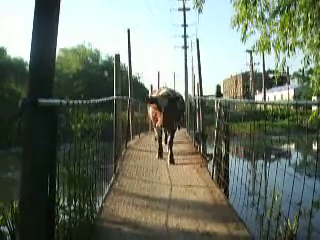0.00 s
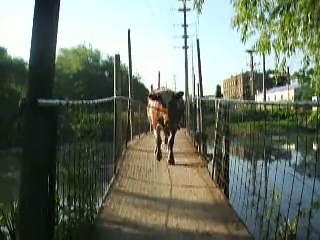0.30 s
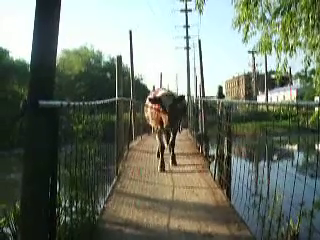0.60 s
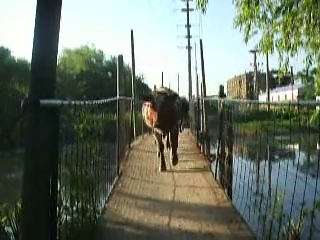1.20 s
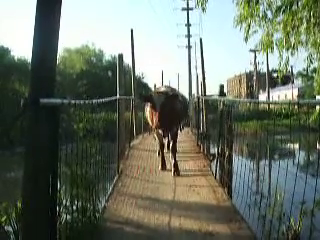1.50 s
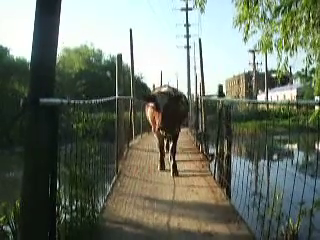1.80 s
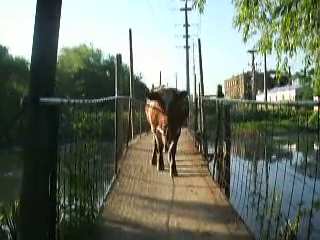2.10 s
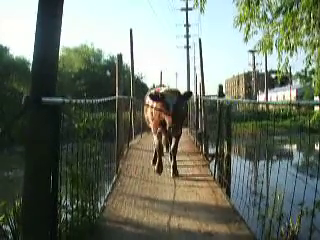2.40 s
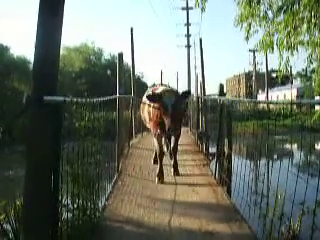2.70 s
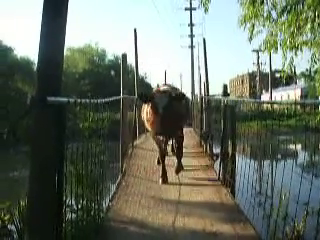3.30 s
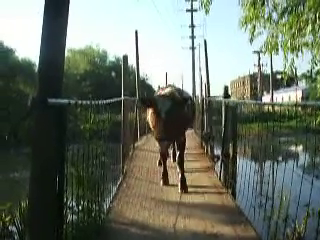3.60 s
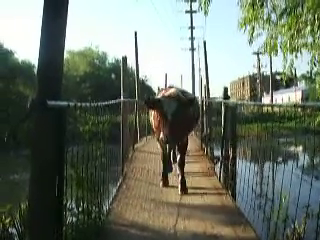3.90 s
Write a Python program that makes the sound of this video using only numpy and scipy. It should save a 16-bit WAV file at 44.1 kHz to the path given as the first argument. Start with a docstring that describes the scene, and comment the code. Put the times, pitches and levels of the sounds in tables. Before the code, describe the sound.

A cow's hooves knock and scrape on a hard footbridge while small birds chirp.

```python
"""A cow walks over a hard footbridge: its hooves knock on the deck, scrape grit and drag softly.
Each knock is a hollow thud, ringing deck modes, a rim pulse and a noise clack; scrapes are dense grains.
Small birds chirp around a pond in short sine glides with an echo.
Behind them are a steady hiss and the rumble and engine hum of distant traffic."""
import sys
import numpy as np
from scipy import signal
from scipy.fft import rfft, irfft, next_fast_len
from scipy.io import wavfile
from scipy.ndimage import map_coordinates

SR = 44100
rng = np.random.default_rng(int(sys.argv[2]) if len(sys.argv) > 2 else 0)


def persist_wave(psi):
    """Save psi, clipped to +-1, as 16-bit WAV."""
    counts = np.round(np.clip(psi, -1, 1) * 32767).astype(np.int16)
    wavfile.write(sys.argv[1], SR, np.atleast_2d(counts).T)


N = 176400


def amp(db):
    return 10 ** (np.asarray(db) / 20)


def unit_rms(x):
    return x / np.sqrt(np.mean(x ** 2) + 1e-20)


def clock():
    return np.arange(N) / SR


def curves(rows):
    """Per-sample curve for each column after time_s."""
    time_s, *columns = np.transpose(rows)
    return [np.interp(clock(), time_s, column) for column in columns]


def wobble(rate_hz):
    """Smooth random curve, rate_hz knots a second."""
    return map_coordinates(rng.standard_normal(int(N * rate_hz / SR) + 4), [clock() * rate_hz])


def filtered(x, response):
    """x through the gain response(hz)."""
    size = next_fast_len(N + SR // 2)
    return irfft(rfft(x, size) * response(np.fft.rfftfreq(size, 1 / SR)), size)[:N]


def coloured(x, spectrum):
    """x through (freq_hz, gain_db) points, rms 1."""
    freq_hz, gain_db = np.transpose(spectrum)
    return unit_rms(filtered(x, lambda hz: amp(np.interp(np.log(hz + 1), np.log(freq_hz), gain_db))))


def noise(spectrum):
    return coloured(rng.standard_normal(N), spectrum)


def noise_band(centre_hz, width_hz):
    white = rng.standard_normal(N)
    return unit_rms(filtered(white, lambda hz: 1 / (1 + (2 * (hz - centre_hz) / width_hz) ** 2)))


def add(track, start_s, sound):
    part = track[max(round(start_s * SR), 0):][:len(sound)]
    part += sound[:len(part)]


# freq_hz, gain_db
HISS_SPECTRUM = [(400, 2.5), (700, 4.5), (1100, 1.5), (1700, -0.5), (3800, -1.5), (5200, -4.5), (6500, -10),
                 (8000, -20)]
RUMBLE_SPECTRUM = [(28, -23), (38, 1.5), (50, -4), (75, -1.5), (175, -3), (280, -1.5), (420, -8.5),
                   (650, -13.5), (1200, -42.5)]
# centre_hz, width_hz, level_db
HISS_BANDS = [(1370, 22, -62), (2527, 56, -62.5), (3825, 230, -58.5)]
# time_s, hiss_db, rumble_db
BACKGROUND_LEVELS = [(0, -40, -35.5), (1.4, -40.5, -37.5), (2.2, -43.5, -39.5), (3.7, -44.5, -38.5),
                     (4, -40.5, -35)]


def hiss_and_traffic():
    """Steady hiss with faint narrow bands, over the rumble of distant traffic."""
    hiss_db, rumble_db = curves(BACKGROUND_LEVELS)
    hiss = noise(HISS_SPECTRUM) * amp(hiss_db + 0.5 * wobble(40))
    whine = sum(amp(db) * noise_band(hz, width_hz) for hz, width_hz, db in HISS_BANDS)
    rumble = noise(RUMBLE_SPECTRUM) * amp(rumble_db + 0.8 * wobble(15))
    return hiss + whine * amp(hiss_db - hiss_db.mean()) + rumble


# time_s, pitch_hz, level_db
ENGINE_HUM = [(0, 116, -43.5), (.9, 118.8, -41.5), (1.6, 127, -42.5), (2.3, 131.8, -47),
              (2.7, 135.5, -36.5), (3.3, 136, -48), (4, 142, -42)]


def engine():
    """A distant engine hums unsteadily and slowly gains speed."""
    pitch_hz, level_db = curves(ENGINE_HUM)
    phase = 2 * np.pi * np.cumsum(pitch_hz * (1 + 0.0094 * wobble(18))) / SR
    fundamental = np.sin(phase) * amp(2.2 * wobble(14))
    octave = np.sin(2 * phase) * amp(-9 + 1.5 * wobble(13))
    return amp(level_db) * (fundamental + octave)


# freq_hz, gain_db
DRAG_SPECTRUM = [(100, -18), (300, 9), (1000, 1), (1600, -9), (2500, 3), (3300, -3.5), (8000, -27)]
# centre_s, sigma_s, level_db
DRAGS = [(0.015, 0.034, -35.5), (0.255, 0.033, -31), (1.078, 0.04, -33), (1.347, 0.022, -40.5),
         (3.99, 0.019, -33.5)]


def hoof_drags():
    """A dragging hoof swishes: noise in Gaussian swells."""
    t = clock()
    swell = sum(amp(db) * np.exp(-((t - centre_s) / sigma_s) ** 2 / 2) for centre_s, sigma_s, db in DRAGS)
    return swell * noise(DRAG_SPECTRUM) * amp(0.34 * wobble(90))


# freq_hz, gain_db, t60_s
DECK_MODES = [(133, 2, 0.11), (211, 0.5, 0.25), (325, -3.5, 0.22), (388.6, -8, 0.24), (706, -8, 0.11)]
# freq_hz, gain_db
CLACK_SPECTRUM = [(80, -30), (200, 5.5), (400, 4.5), (900, -2.5), (1500, -19), (8000, -33)]
# start_s, level_db, thud_hz, clack_gain_db
HOOF_KNOCKS = [(0.125, -25, 148.5, -12), (.131, -26, 646, -8), (.333, -21.5, 240, -14),
               (.478, -25, 665, -9), (0.827, -27.5, 320, -7), (.969, -22, 560, -10),
               (1.128, -28.5, 317, -20), (1.28, -26, 300, -20.5), (1.524, -21, 321, -16.5),
               (1.682, -25, 345, -4), (2.004, -25.5, 290, -16), (2.024, -25.5, 232, -17),
               (2.423, -18.5, 259, -21), (2.479, -26.5, 268, -13), (2.794, -23.5, 282, -7),
               (2.887, -24.5, 287, -9), (2.915, -27.5, 217, -3.5), (3.335, -23, 263, -2.5),
               (3.798, -21.5, 359, 0.5), (3.819, -24.5, 245, -2.5)]


def hoof_knocks():
    """A hoof thuds at a pitch set by where it lands, rings deck modes near that pitch and clacks."""
    attack_s, thud_t60_cycles, spread_octaves = 0.00079, 29.4, 0.63
    clack_t60_s, tail_t60_s = 0.014, 0.32
    push_hz, push_delay_s = 474, 0.001
    out, t = np.zeros(N), clock()[:SR // 3]
    clack_noise = noise(CLACK_SPECTRUM)
    clack_decay = amp(-60 * t / clack_t60_s) + amp(-10.5 - 60 * t / tail_t60_s)
    attack = 1 - np.exp(-t / attack_s)
    mode_hz, mode_db, t60_s = np.transpose(DECK_MODES)
    u = (np.pi * push_hz * (t - push_delay_s)) ** 2
    rim_push = (1 - 2 * u) * np.exp(-u)  # one hard pulse from the hoof rim
    for start_s, level_db, thud_hz, clack_gain_db in HOOF_KNOCKS:
        detuning = np.log2(mode_hz / thud_hz) / spread_octaves
        weight = amp(mode_db + rng.normal(0, 1.3, len(mode_hz))) / (1 + 2 * detuning ** 2)
        phase = rng.uniform(0, 2 * np.pi, (len(mode_hz), 1))
        modes = np.sin(2 * np.pi * mode_hz[:, None] * t + phase) * amp(-5.5 - 60 * t / t60_s[:, None])
        ring = weight / weight.sum() @ modes
        thud = np.sin(2 * np.pi * thud_hz * t) * amp(-2 - 60 * t * thud_hz / thud_t60_cycles)
        clack = amp(clack_gain_db) * np.roll(clack_noise, rng.integers(N))[:len(t)] * clack_decay
        add(out, start_s, amp(level_db) * (thud + ring + clack) * attack)
        add(out, start_s, amp(level_db + clack_gain_db) * rim_push)
    return out


# start_s, pitch_hz, level_db
BIRD_PIPS = [(.472, 3200, -41), (.585, 3900, -38), (.832, 4150, -39), (1.16, 4500, -38.5),
             (2.165, 2650, -44), (2.483, 3650, -42), (3.105, 4400, -44), (3.167, 4200, -44.5),
             (3.355, 2880, -42), (3.404, 2880, -42)]
# start_s, length_s, start_hz, end_hz, level_db
BIRD_CHIRPS = [(1.622, .055, 4200, 2050, -42), (2.446, 0.038, 4700, 4200, -41.5),
               (2.508, 0.03, 3300, 4250, -40.5), (2.762, 0.028, 4300, 2500, -39),
               (2.942, 0.045, 2900, 2300, -43), (3.762, .024, 4300, 3050, -42),
               (3.94, .055, 2560, 2530, -39.5)]


def birds():
    """Wavering chirps, a run of four falling notes and short pips, with an echo."""
    pip_s, pip_end_ratio, echo_db, echo_t60_s = 0.018, 0.92, -6, 0.34
    out, waver, flutter = np.zeros(N), wobble(300), wobble(200)
    faint_pips = [(when * (N / SR - 2 * pip_s), 3400 * 2 ** (height - 0.5), -47)
                  for when, height in rng.random(size=(50, 2))]
    pips = [(start_s, pip_s, hz, hz * pip_end_ratio, db) for start_s, hz, db in BIRD_PIPS + faint_pips]
    falling_run = [(1.835 + k * 0.072, 0.045, 5900, 3200, -44) for k in range(4)]
    for start_s, length_s, start_hz, end_hz, level_db in BIRD_CHIRPS + falling_run + pips:
        progress = np.linspace(0, 1, int(length_s * SR))
        span = slice(int(start_s * SR), int(start_s * SR) + len(progress))
        pitch_hz = start_hz * (end_hz / start_hz) ** progress * (1 + 0.018 * waver[span])
        envelope = amp(level_db + 2.2 * flutter[span]) * np.sqrt(np.abs(np.sin(np.pi * progress)))
        add(out, start_s, envelope * np.sin(2 * np.pi * np.cumsum(pitch_hz) / SR))
    t = clock()[:SR // 2]
    tail = rng.standard_normal(len(t)) * amp(-60 * t / echo_t60_s)
    return out + amp(echo_db) * signal.fftconvolve(out, tail / np.linalg.norm(tail))[:N]


# freq_hz, gain_db
GRIT_SPECTRUM = [(500, -22), (1500, -10.5), (3000, 3.5), (3950, 6.5), (4700, 1), (6500, -4.5), (8500, -24)]
DECK_SPECTRUM = [(100, -12), (300, 4), (800, 1.5), (1400, -4), (2600, -7.5), (4500, -30)]
# start_s, hold_s, level_db, deck_gain_db
HOOF_SCRAPES = [(0.557, 0.0047, -34.5, -11.5), (0.705, 0.038, -35.5, 1.5), (1.713, 0.04, -33, 1),
                (1.947, 0.0085, -41, -11), (2.3, 0.002, -39.5, -24), (2.816, 0.012, -38, -4.5),
                (3.659, 0.022, -43, -3), (3.864, 0.02, -45.5, -2)]


def hoof_scrapes():
    """Grit crushed under a sliding hoof: a brief squeak, bright grains, duller noise through the deck."""
    attack_s, t60_s, squeak_s, grains_per_s = 0.004, 0.3, 0.015, 2400
    grit_env, deck_env, squeak_env = np.zeros((3, N))
    for start_s, hold_s, level_db, deck_gain_db in HOOF_SCRAPES:
        age_s = np.maximum(clock() - start_s, 0)
        release_db = -60 * np.maximum(age_s - hold_s, 0) / t60_s
        stroke = np.minimum(age_s / attack_s, 1) * amp(level_db + release_db)
        squeak_env += stroke * amp(3) * np.exp(-(age_s / squeak_s) ** 2)
        grit_env += stroke
        deck_env += stroke * amp(deck_gain_db)
    grains = unit_rms((rng.random(N) < grains_per_s / SR) * rng.standard_normal(N))
    grit = grit_env * coloured(grains + rng.standard_normal(N), GRIT_SPECTRUM)
    deck = deck_env * noise(DECK_SPECTRUM)
    judder = amp(wobble(150))
    squeak = squeak_env * noise_band(centre_hz=3950, width_hz=600)
    return (grit + deck) * judder + squeak


def scene():
    """Mono mix: hooves, birds, far surroundings."""
    hooves = hoof_knocks() + hoof_scrapes() + hoof_drags()
    return (hooves + birds() + hiss_and_traffic() + engine())[None]


def record(dry):
    """Steep low-pass plus a constant offset."""
    corner_hz, stop_hz, dc_offset = 8300, 9100, -0.074
    return filtered(dry[0], lambda hz: (hz < stop_hz) / (1 + (hz / corner_hz) ** 36))[None] + dc_offset


dry = scene()
out = record(dry)
persist_wave(out)
```